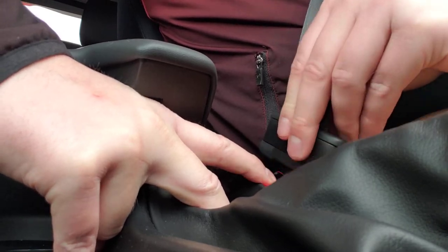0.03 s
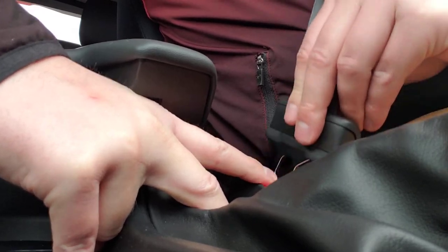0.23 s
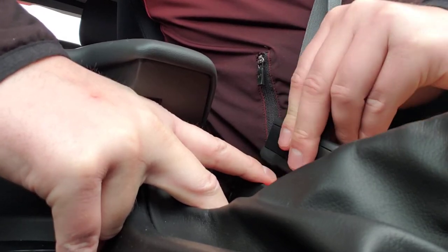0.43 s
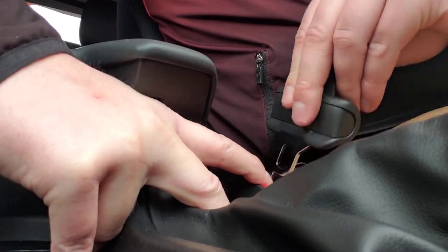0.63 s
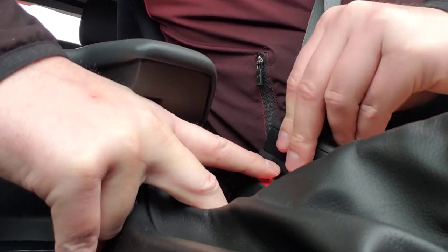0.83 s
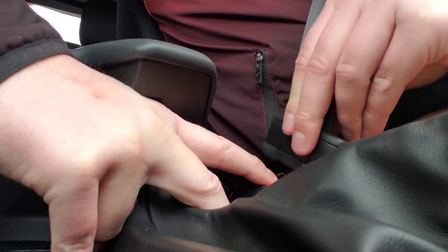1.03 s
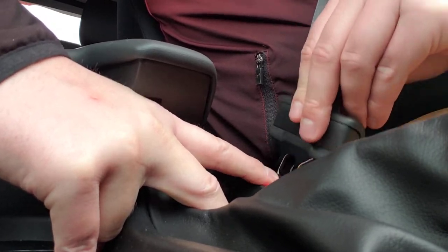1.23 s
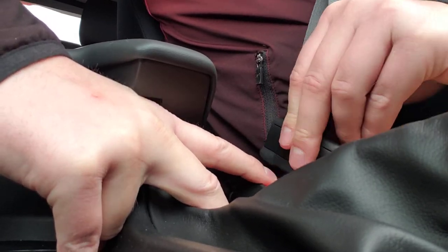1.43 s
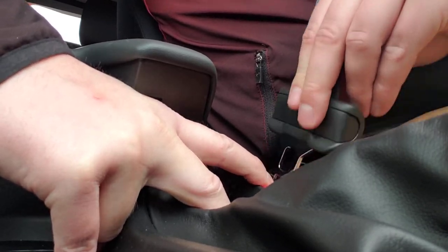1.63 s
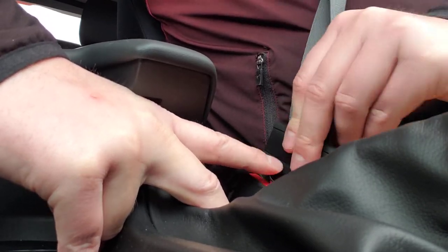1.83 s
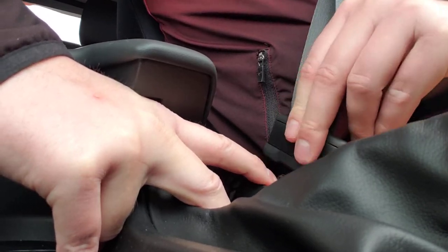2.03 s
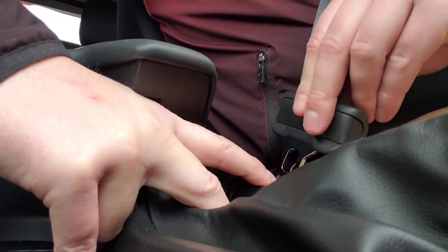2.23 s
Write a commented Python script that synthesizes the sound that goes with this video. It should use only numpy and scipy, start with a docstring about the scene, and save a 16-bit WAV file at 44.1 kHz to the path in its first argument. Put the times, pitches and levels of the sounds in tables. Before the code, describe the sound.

A seat belt is released and buckled again and again, close by in a parked car. Each time the button clicks, the metal tongue springs out, taps and scrapes back in, then latches with a sharp snap and thump.

```python
"""First comes a soft scrape over a parked car's faint rumble, then a click: a seat belt springs open.
Close by, it is buckled and released about twice a second. Its metal tongue taps and slides into the
buckle and latches with a crack and a thump; the button is pressed and a spring throws the tongue out.
Each hit makes the steel and plastic ring briefly."""
import sys
import numpy as np
from scipy import signal
from scipy.io import wavfile

SR = 44100
rng = np.random.default_rng(int(sys.argv[2]) if len(sys.argv) > 2 else 0)


def wav_out(sig):
    """Save sig, one row per channel (or a flat mono array), as 16-bit PCM at SR to the path in sys.argv[1]."""
    wavfile.write(sys.argv[1], SR, np.round(np.clip(np.atleast_2d(sig).T, -1, 1) * 32767).astype(np.int16))


N = 105840
AGE = np.arange(SR // 4) / SR  # seconds since a hit
BAND_EDGES_HZ = np.geomspace(22, 17800, 30)
BAND_HZ = np.sqrt(BAND_EDGES_HZ[1:] * BAND_EDGES_HZ[:-1])
BAND_FILTERS = [signal.butter(2, edges, "band", fs=SR, output="sos")
                for edges in zip(BAND_EDGES_HZ, BAND_EDGES_HZ[1:])]


def from_db(db):
    """Turn decibels into a number to multiply by."""
    return 10 ** (np.asarray(db) / 20)


def at_hz(points, hz):
    """Read between the rows of a table of frequencies, on a musical (log) scale."""
    freqs, values = np.transpose(points)
    return np.interp(np.log(hz), np.log(freqs), values)


def dying(fade_s):
    """Die away by 60 dB in fade_s seconds."""
    return np.exp(-np.log(1000) * AGE / fade_s)


def add(out, t, sound):
    """Mix a sound in at t seconds."""
    start = max(int(t * SR), 0)
    out[:, start:start + sound.shape[-1]] += sound[..., :max(N - start, 0)]


# How late the left ear hears each pitch: f/Hz, delay/s
LEFT_EAR_DELAY = [(300, .00002), (1100, .00003), (1700, .00025), (15000, .00022)]
def place(pair, hz, pan_db):
    """The buckle is on the right, so the left ear hears it later; pan_db is left minus right."""
    lag = int(abs(at_hz(LEFT_EAR_DELAY, hz)) * SR)
    left = np.pad(pair[0], (lag, 0))[:pair.shape[1]]
    gains = from_db([pan_db / 2, -pan_db / 2])
    return np.array([left, pair[1]]) * gains[:, None] / np.sqrt(np.mean(gains ** 2))


# How alike the two ears' sounds are: f/Hz, likeness (1 = the same)
EAR_LIKENESS = [(40, 0.99), (85, .6), (130, .95), (300, 0.65), (800, 0.73), (1400, 0.57), (3000, 0.38),
                (8000, 0.16), (15000, 0.27)]
# Which side is louder: f/Hz, left minus right/dB
EAR_BALANCE = [(300, 0), (800, 0), (1350, 0), (2400, -7), (4500, -5.5), (8000, -6.5), (15000, -2.5)]
def shaped_noise(colour, envelope, size, lowest_hz=270, tone=np.zeros_like):
    """Stereo noise in narrow bands: colour sets each band's share, envelope its loudness over time."""
    white, out = rng.standard_normal((3, 2, size)), np.zeros((2, size))
    gains = from_db(at_hz(colour, BAND_HZ)) * (BAND_HZ > lowest_hz)
    power = np.sum(gains ** 2 * np.diff(BAND_EDGES_HZ)) * 2 / SR
    gains = gains / np.sqrt(power) * from_db(tone(BAND_HZ))
    for k in np.flatnonzero(gains):
        hz, (mid, side) = BAND_HZ[k], white[k % len(white)]
        alike = at_hz(EAR_LIKENESS, hz)
        pair = np.sqrt((1 + alike) / 2) * mid + np.sqrt((1 - alike) / 2) * side * [[1], [-1]]
        band = signal.sosfilt(BAND_FILTERS[k], pair * envelope(hz) + 1e-18)
        out += gains[k] * place(band, hz, at_hz(EAR_BALANCE, hz))
    return out


# The rumble's mix of low and high: f/Hz, relative level/dB
RUMBLE_COLOUR = [(25, -27.5), (38, -13), (56, 1), (85, -7), (115, -17), (160, -16), (225, -11),
                 (320, -25.5), (600, -29), (1200, -38.5), (2500, -41.5), (4500, -52.5), (8000, -55.5),
                 (16000, -58.5)]
def cabin_rumble():
    """A faint, steady, deep noise fills the car."""
    return from_db(-44) * shaped_noise(RUMBLE_COLOUR, lambda hz: 1, N, lowest_hz=0)


# Tongue and button slide in their guides: start t/s, end t/s, start level/dB, end level/dB
SCRAPES = [(0, 0.093, -48.5, -48), (0.23, 0.282, -58, -61), (0.279, 0.326, -43, -40.5),
           (.46, 0.52, -60, -55), (0.538, .559, -53, -48), (.56, .568, -41, -36), (.695, .76, -51, -42),
           (0.759, .82, -38, -43.5), (0.968, 1.082, -56, -54), (1.084, 1.092, -48, -38),
           (1.219, 1.283, -48, -42), (1.287, 1.34, -38, -41), (1.467, 1.574, -54.5, -50),
           (1.575, 1.583, -44, -36), (1.709, 1.787, -45, -46.5), (1.79, 1.843, -45.5, -40.5),
           (2.076, 2.132, -61, -54), (2.252, 2.319, -44, -48), (2.341, 2.405, -48, -44)]
# The scrape's mix of low and high: f/Hz, relative level/dB
SCRAPE_COLOUR = [(300, -1.5), (550, -2), (900, 3), (1300, 0.5), (2000, 4), (3000, 2), (4700, -11),
                 (7000, -5.5), (9000, -16.5), (12000, -14.5), (16000, -20.5)]
def sliding(slips_per_s=750, spread_db=3.8, fade_s=0.0045, ring_s=0.0034):
    """Rubbing is a stream of tiny uneven slips, each ringing for a few milliseconds."""
    t, level = np.arange(N) / SR, 0
    for start, end, start_db, end_db in SCRAPES:
        fade = np.clip(np.minimum(t - start, end - t) / fade_s + .5, 0, 1)
        level = level + from_db(np.interp(t, [start, end], [start_db, end_db])) * fade
    slipping = rng.random(N) < slips_per_s / SR
    slips = slipping * from_db(spread_db * np.minimum(rng.exponential(1, N), 4))
    energy = (slips * level) ** 2 / np.mean(slips ** 2)
    carry = np.exp(-2 / (ring_s * SR))  # share of energy left one sample later
    grain = np.sqrt(signal.lfilter([1 - carry], [1, -carry], energy + 1e-18))
    return shaped_noise(SCRAPE_COLOUR, lambda hz: grain, N)


def ring(hz, fade_s):
    """A struck part rings with one pure, fading note."""
    return np.sin(2 * np.pi * hz * AGE) * dying(fade_s)


def hit_tone(low_db=0, middle_db=0, treble_db=0, accent_hz=1000, accent_db=0):
    """Tone controls for one hit: three broad ranges and one narrow boost, the accent."""
    broad = [(800, low_db), (2500, middle_db), (10000, treble_db)]
    return lambda hz: at_hz(broad, hz) + accent_db * np.exp(-(np.log2(hz / accent_hz) / 0.18) ** 2)


# The notes of buckle and tongue: f/Hz, level/dB, fade/s (capped below), left minus right/dB
BUCKLE_NOTES = [(812, -15, 0.076, 0.5), (1012, -22.5, .07, -1), (1345, -17.5, 0.056, 1),
                (1551, -16.5, .07, 0), (2120, -17, 0.092, -7), (2310, -17.5, 0.08, -5.5),
                (2940, -18, 0.1, -7.5), (3080, -15.5, .075, -10.5), (3826, -21.5, 0.077, -4),
                (4780, -24.5, 0.051, -5.5), (5455, -21.5, 0.077, -3), (6300, -22, 0.062, -7),
                (6850, -19, .07, -10), (7800, -24, .06, -2), (8300, -25, .06, -5),
                (10560, -23, 0.065, -4.5), (12310, -23.5, .055, -2.5), (13400, -25, .055, -3.5)]
BUCKLE_RINGS = np.array([place(np.tile(ring(hz, min(fade_s, .09)), (2, 1)), hz, pan_db)
                         for hz, _, fade_s, pan_db in BUCKLE_NOTES])
# How long the noisy tail of a hit lasts: f/Hz, fade/s
TAIL_FADES = [(300, 0.12), (800, 0.07), (2000, 0.059), (3200, 0.072), (5000, 0.061), (14000, 0.05)]
def hit(colour, tone, crack_db=-1.5, crack_s=.014, tail_db=-9.5, notes_db=-3.5, rise_s=0):
    """Hard parts meet: a short crack, a noisy tail, the cabin's faint echo and the buckle's notes."""
    size = int(.13 * SR)
    age = AGE[:size]
    crack = from_db(crack_db) * dying(crack_s)[:size]
    echo = from_db(-49.5) * dying(.25)[:size]

    def envelope(hz):
        """The soft seats swallow the tail ever faster."""
        tail = np.exp(-np.log(1000) * (age / at_hz(TAIL_FADES, hz)) ** 1.327)
        return crack + echo + from_db(tail_db) * tail

    out = shaped_noise(colour, envelope, size, tone=tone)
    hz, db = np.transpose(BUCKLE_NOTES)[:2]
    scatter_db = 2 * rng.standard_normal(len(hz))
    gains = from_db(db + notes_db + scatter_db + tone(hz)) * rng.choice([-1, 1], len(hz))
    out += np.tensordot(gains, BUCKLE_RINGS[..., :size], 1)
    return out * (1 - np.exp(-(age / rise_s) ** 2)) if rise_s else out


def thump(notes):
    """The buckle's stalk and the cabin shake: low notes swell over a few cycles and fade."""
    out = 0
    for hz, db, delay_s, rise_s in notes:
        age = np.maximum(AGE - delay_s, 0)
        swell = (age / rise_s) ** 2
        out = out + from_db(db) * swell * np.exp(1 - swell) * np.sin(2 * np.pi * hz * age)
    return out


# Low notes of a gentle knock: f/Hz, relative level/dB, delay/s, rise/s
LIGHT_THUMP_NOTES = [(233.7, 0.5, 0.0012, 0.015), (215.6, -13, .015, .026), (420, -14.5, 0.00071, 0.0075),
                     (139, -15, 0.0035, 0.018), (75, -11.5, 0.0036, .024)]
def light_thump(db):
    """A press, tap or release nudges the stalk."""
    return from_db(db) * thump(LIGHT_THUMP_NOTES)


# Each push of the button: t/s, level/dB, thump/dB
BUTTON_CLICKS = [(.0315, -24.5, -33.5), (0.5234, -25, -34), (1.0100, -25.5, -32), (1.5235, -26, -32),
                 (2.0635, -26, -32)]
# The click's mix of low and high: f/Hz, relative level/dB
BUTTON_COLOUR = [(300, -2), (550, -2.5), (820, 2.5), (1150, -4), (1900, 3.5), (3000, 0.5), (4600, -7.5),
                 (7200, -1), (9500, -14), (13000, -11.5), (16000, -18)]
def button_presses():
    """The button clicks against the catch that holds the tongue."""
    out, tone = np.zeros((2, N)), hit_tone(low_db=-1, middle_db=-1.5, treble_db=-1.5)
    for t, db, thump_db in BUTTON_CLICKS:
        click = hit(BUTTON_COLOUR, tone, crack_db=-1, crack_s=0.0322, tail_db=-10, notes_db=-3)
        add(out, t, from_db(db) * click)
        add(out, t, light_thump(thump_db))
    return out


# Each light tap: t/s, level/dB, treble change/dB, thump/dB
TONGUE_TAPS = [(.075, -35, -1, -42), (.1985, -43.5, -19, -63), (.2185, -36.5, 1.5, -42.5),
               (.2225, -35.5, 1, -58), (.247, -46, -3, -50), (.281, -27.5, 0, -39), (.4495, -30, 1, -48),
               (.456, -34, -1, -50), (.695, -40.5, -9, -47), (.7275, -33, -3, -47), (.744, -36.5, -5, -48),
               (.768, -35, 2, -46), (.8055, -26.5, 0, -46), (.954, -35, 0.5, -41), (.959, -33, 3, -46),
               (.995, -44, -11, -55), (1.230, -35.5, 4, -49), (1.283, -29, 1, -41.5), (1.292, -30, 2, -47),
               (1.4515, -33, 0.5, -48.5), (1.456, -33, 0.5, -52), (1.7135, -38.5, 1.5, -48),
               (1.719, -35, 4, -50.5), (1.751, -35.5, 2, -40.5), (1.7555, -33, 2.5, -44),
               (1.789, -36.5, 1, -39.5), (1.804, -36.5, 1, -43), (1.964, -38.5, -3, -47.5),
               (1.969, -34, 0.5, -53), (2.256, -34.5, 5, -48), (2.281, -33, 2, -48),
               (2.304, -38.5, -0.5, -50), (2.3375, -33, -6, -41), (2.3545, -34, -2, -42),
               (2.379, -38, 3, -46)]
# The tap's mix of low and high: f/Hz, relative level/dB
TONGUE_COLOUR = [(300, -3.5), (550, -4.5), (900, 0.5), (1300, -0.5), (2700, 2), (4700, -9.5), (7000, -0.5),
                 (9000, -15), (12000, -9.5), (16000, -21.5)]
def tongue_taps(treble_hz=5000):
    """The loose tongue taps lightly in the slot, some taps brighter than others."""
    out = np.zeros((2, N))
    ticks = [hit(TONGUE_COLOUR, hit_tone()) for _ in range(5)]
    lowpass = signal.butter(1, treble_hz, fs=SR)
    for k, (t, db, treble_db, thump_db) in enumerate(TONGUE_TAPS):
        tick = ticks[k % len(ticks)]
        dull = signal.lfilter(*lowpass, tick)
        add(out, t, from_db(db) * (dull + from_db(treble_db) * (tick - dull)))
        add(out, t, light_thump(thump_db))
    return out


# Each opening: t/s, level/dB, slip before/s, slip/dB, bounce after/s, bounce/dB,
# low/dB, middle/dB, treble/dB, thump/dB (slip and bounce are relative to level)
OPENINGS = [(0.0913, -13, .0037, -6.5, 0.024, -17.5, -0.5, -0.5, -3.5, -31),
            (0.5694, -10.5, .003, -8, .0245, -23, -3, 0.5, 0, -31),
            (1.0946, -11, .0042, -6.5, 0.019, -16, -0.5, 0, -0.5, -30),
            (1.5843, -12, .004, -7, .024, -21.5, -1, -1.5, 1, -27.5),
            (2.1240, -17, 0.004, -1.5, 0.026, -13, -2.5, 1, -1, -23.5)]
# The opening's mix of low and high: f/Hz, relative level/dB
OPENING_COLOUR = [(300, -12), (550, -10), (900, -6), (1150, 2.5), (1420, 6), (1800, 0), (2200, 2.5),
                  (3000, -0.5), (4500, -5), (7500, -3), (11000, -5.5), (16000, -10)]
def releases():
    """The catch slips, the spring's pusher strikes and the tongue bounces with a bright tick."""
    out = np.zeros((2, N))
    blow = dict(crack_db=2.5, crack_s=.011, tail_db=-13, notes_db=-4.5)
    bounce_tone = hit_tone(low_db=-7, middle_db=-2.5, treble_db=3)
    for t, db, slip_s, slip_db, bounce_s, bounce_db, *tone_db, thump_db in OPENINGS:
        tone = hit_tone(*tone_db, accent_hz=1360, accent_db=3.5)  # the hollow plastic shell
        add(out, t - slip_s, from_db(db + slip_db) * hit(OPENING_COLOUR, tone, **blow, rise_s=0.0011))
        add(out, t, from_db(db) * hit(OPENING_COLOUR, tone, **blow))
        add(out, t, light_thump(thump_db))
        add(out, t + bounce_s, from_db(db + bounce_db) * hit(OPENING_COLOUR, bounce_tone))
    return out


# Each twang: t/s, f/Hz, level/dB, fade/s
SPRING_NOTES = [(.092, 2090, -50.5, .25), (.1985, 2100, -42, 0.037), (1.096, 572, -43.5, 0.39),
                (2.124, 560, -42.5, 0.14)]
def spring_twangs():
    """Now and then a spring quivers with one faint note."""
    out = np.zeros((2, N))
    for t, hz, db, fade_s in SPRING_NOTES:
        add(out, t, from_db(db) * ring(hz, fade_s))
    return out


# Each closing: t/s, level/dB, stop after/s, stop/dB (relative to level), low/dB, middle/dB, treble/dB,
# accent f/Hz, accent/dB, thump/dB, ping/dB; the accent depends on where the tongue lands
CLOSINGS = [(0.3266, -9.5, 0.0063, -3.5, 0, -0.5, 1, 870, 5, -19.5, -44.5),
            (0.8199, -8.5, 0.0072, -11, -4, -2.5, 1, 3100, 0.5, -18.5, -44.5),
            (1.333, -8, .004, -7, 1, -0.5, -2, 2200, 9, -19.5, -48.5),
            (1.8450, -8.5, .005, -10.5, 0.5, -1.5, -1, 1500, 1.5, -19, -65)]
# The closing's mix of low and high: f/Hz, relative level/dB
CLOSING_COLOUR = [(300, 0.5), (550, -2), (850, 1), (1400, -0.5), (2400, 1.5), (4500, -4.5), (7000, -1),
                  (9500, -10.5), (12500, -4), (16000, -4)]
# Low notes of a firm push: f/Hz, relative level/dB, delay/s, rise/s
FIRM_THUMP_NOTES = [(224.4, 0, 0.0022, .017), (389, -12, 0.00203, .011), (135, -13, .005, 0.013),
                    (85.9, -12.5, 0.0035, .03), (55, -8, .004, 0.038), (225.6, -21, .036, .03)]
def latches():
    """The catch snaps in, the tongue hits its stop, the stalk takes the push and the spring pings."""
    out = np.zeros((2, N))
    blow = dict(crack_db=0.64, crack_s=0.0088, tail_db=-13, notes_db=-0.5)
    ping = ring(hz=14925, fade_s=.24)
    for t, db, stop_s, stop_db, *tone_settings, thump_db, ping_db in CLOSINGS:
        tone = hit_tone(*tone_settings)
        add(out, t, from_db(db) * hit(CLOSING_COLOUR, tone, **blow))
        add(out, t + stop_s, from_db(db + stop_db) * hit(CLOSING_COLOUR, tone, **blow))
        add(out, t, from_db(thump_db) * thump(FIRM_THUMP_NOTES) + from_db(ping_db) * ping)
    return out


def scene():
    """All the buckle's sounds over the cabin's rumble."""
    return (cabin_rumble() + sliding() + latches() + button_presses()
            + releases() + spring_twangs() + tongue_taps())


def record(dry):
    """Round off the loudest peaks and cut the very highest treble."""
    rounded = 1.1 * np.tanh(dry / 1.1)
    cutoff_hz = 16100
    return signal.sosfilt(signal.ellip(10, .2, 80, cutoff_hz, fs=SR, output="sos"), rounded)


dry = scene()
out = record(dry)
wav_out(out)
```